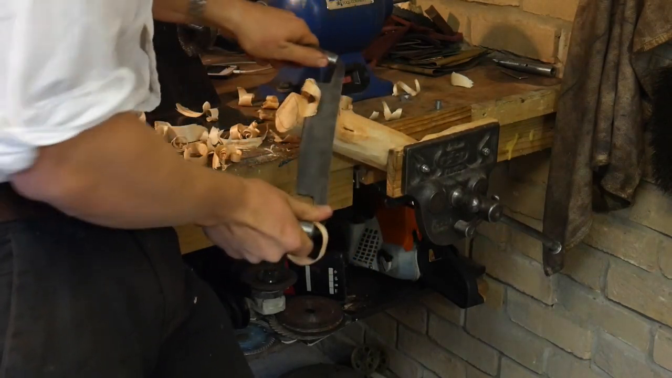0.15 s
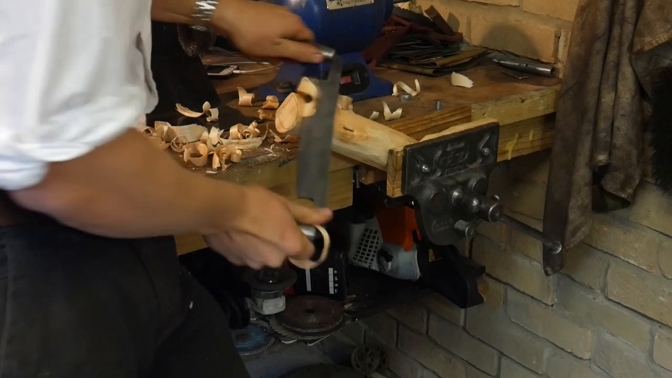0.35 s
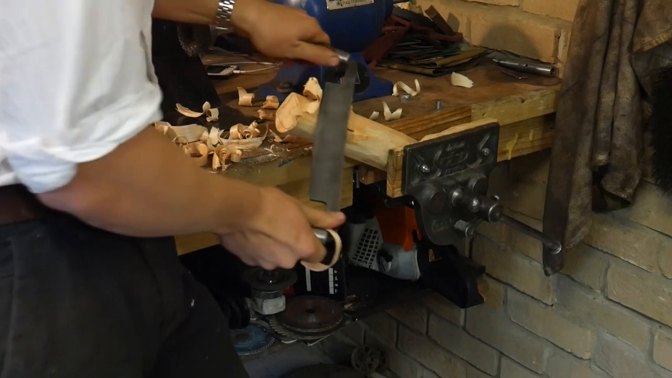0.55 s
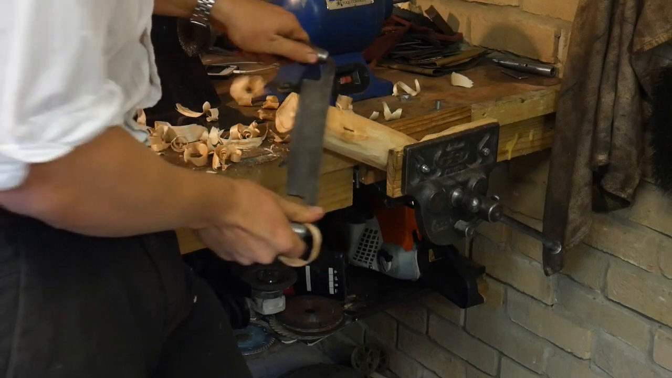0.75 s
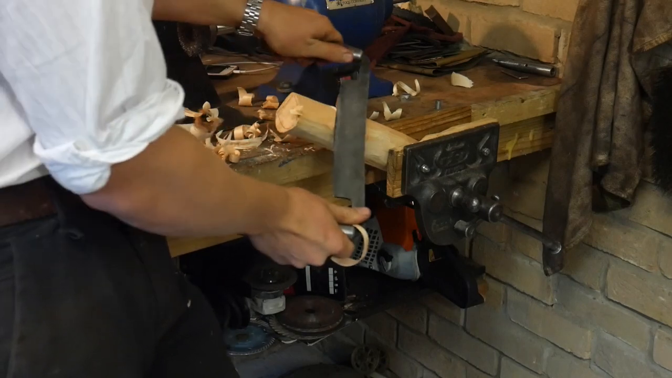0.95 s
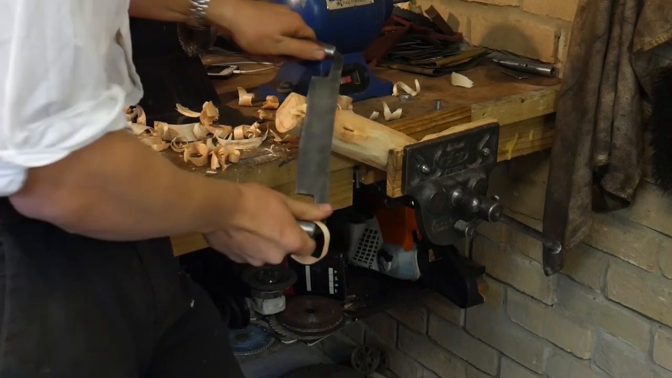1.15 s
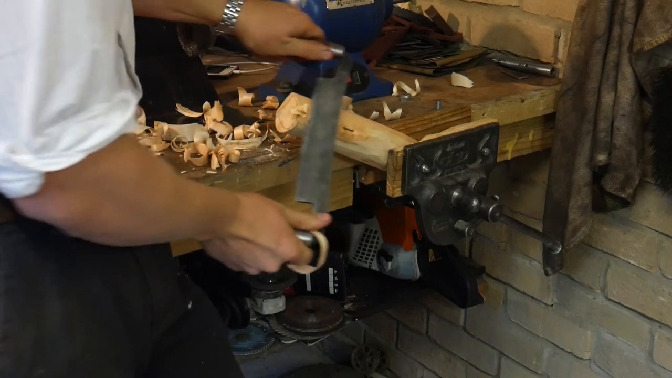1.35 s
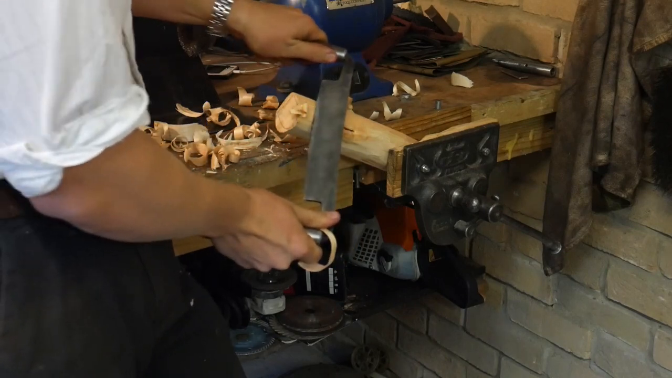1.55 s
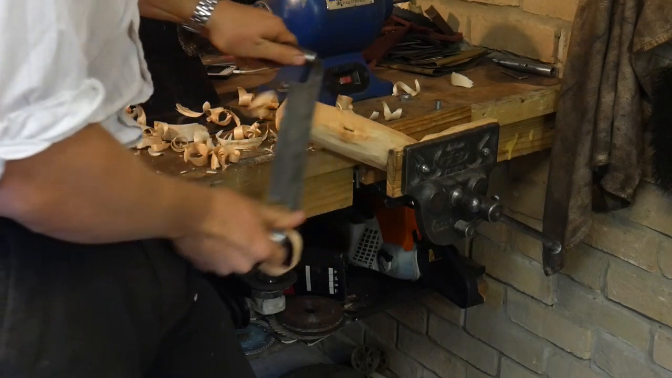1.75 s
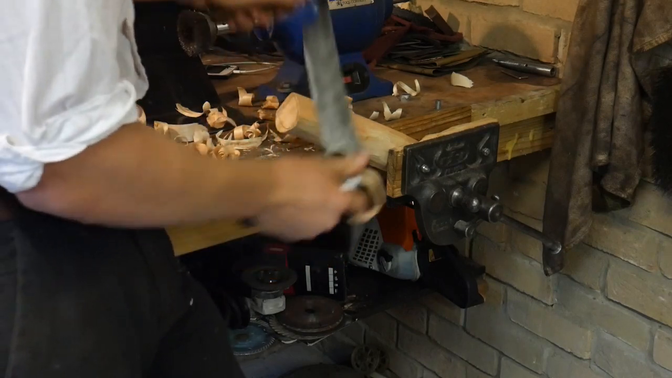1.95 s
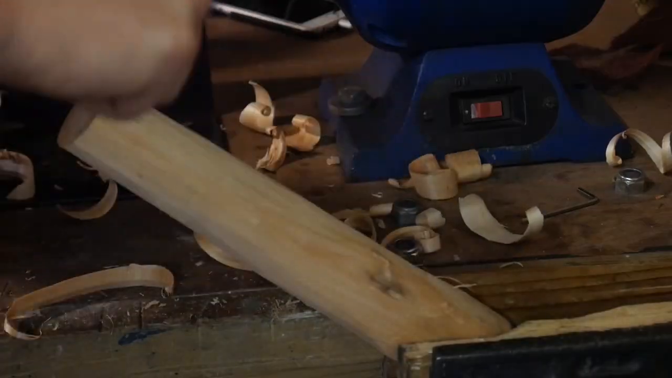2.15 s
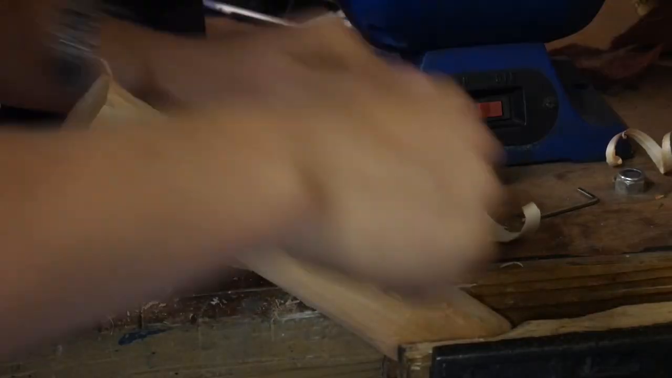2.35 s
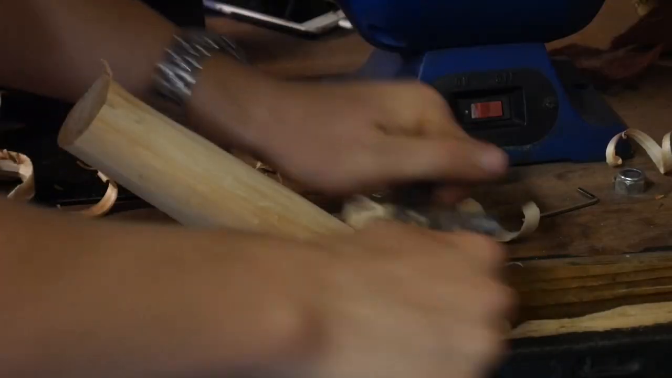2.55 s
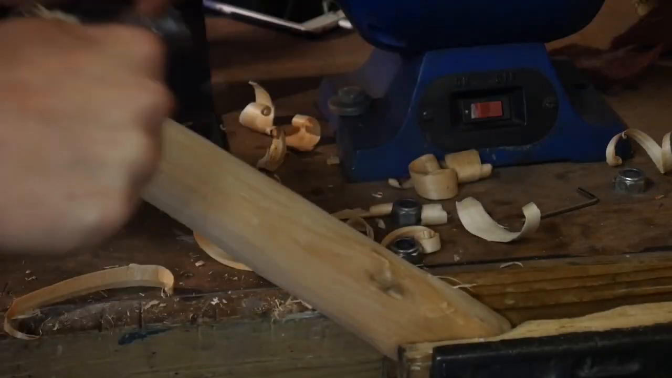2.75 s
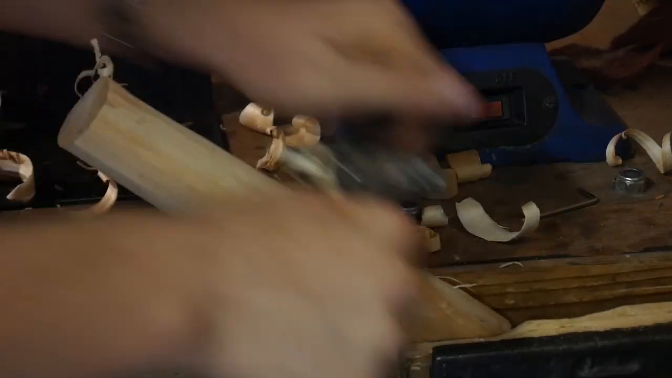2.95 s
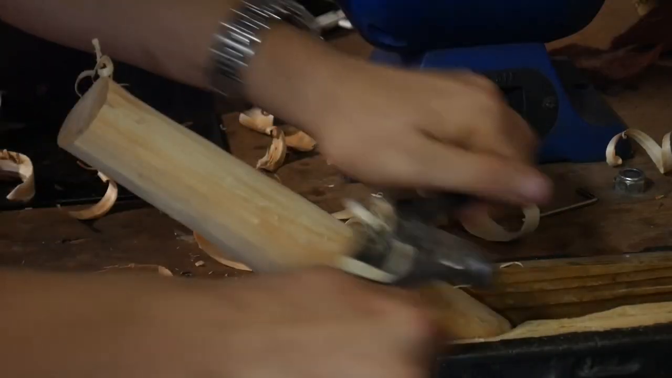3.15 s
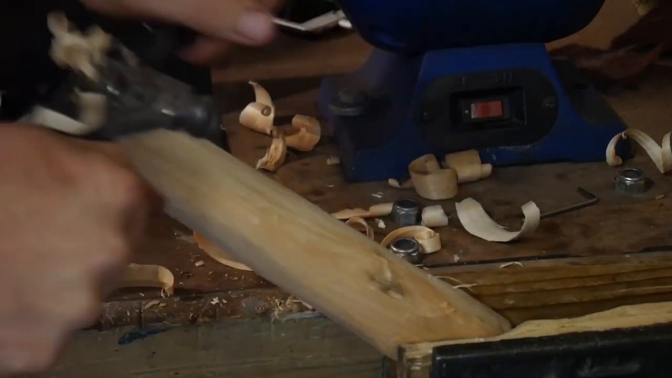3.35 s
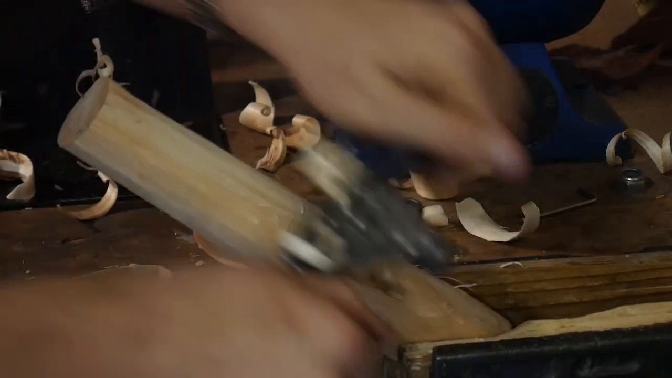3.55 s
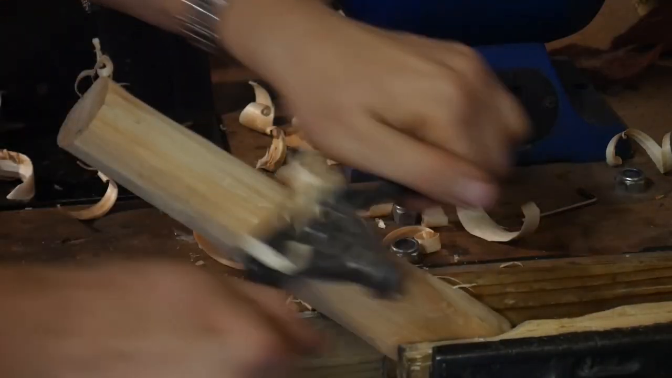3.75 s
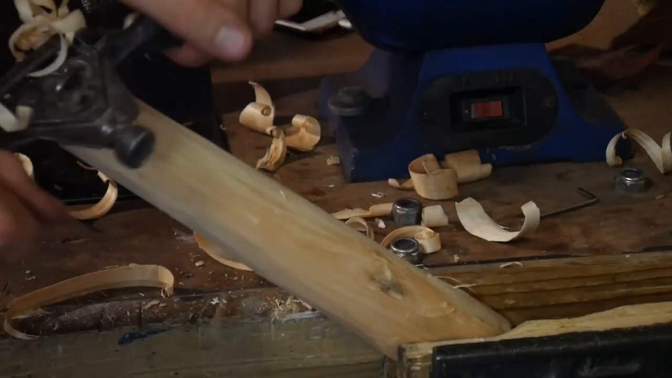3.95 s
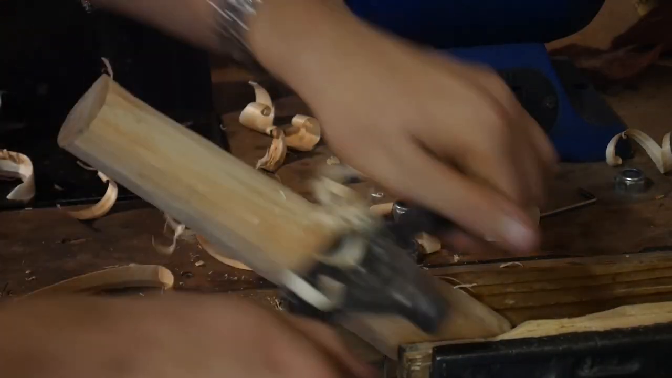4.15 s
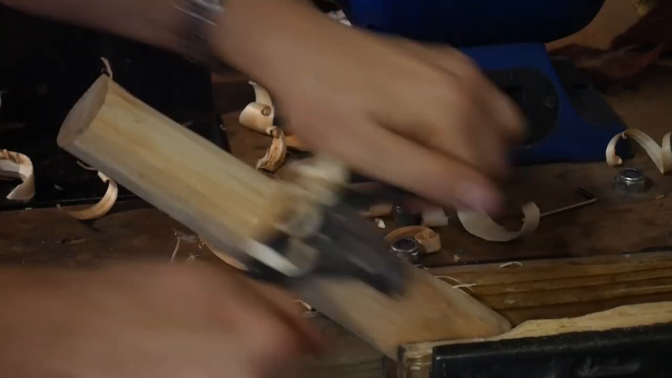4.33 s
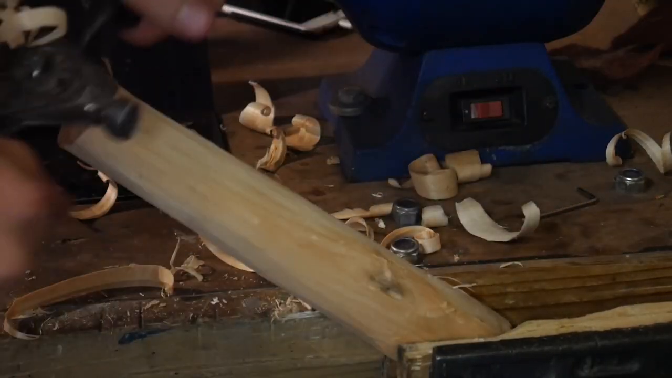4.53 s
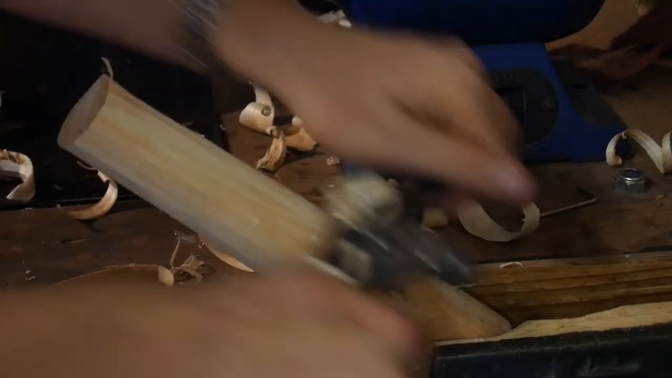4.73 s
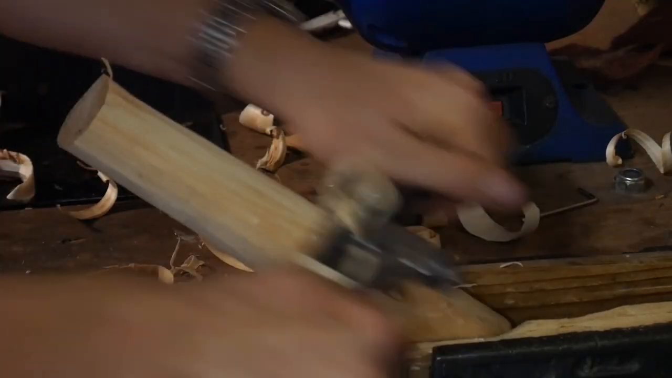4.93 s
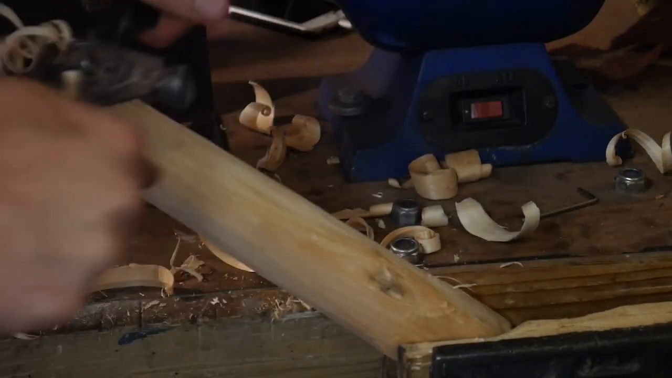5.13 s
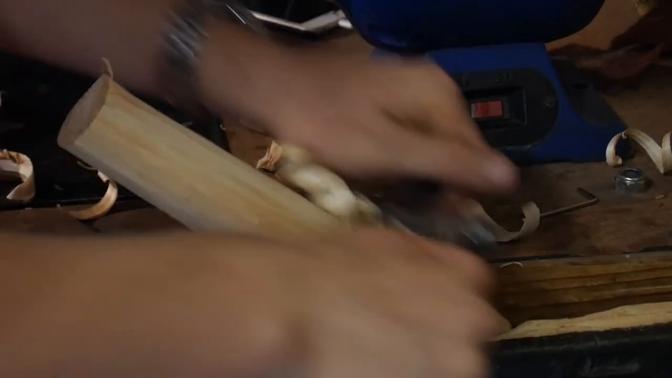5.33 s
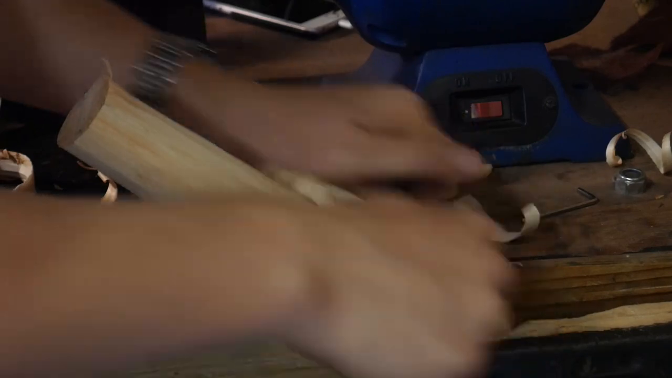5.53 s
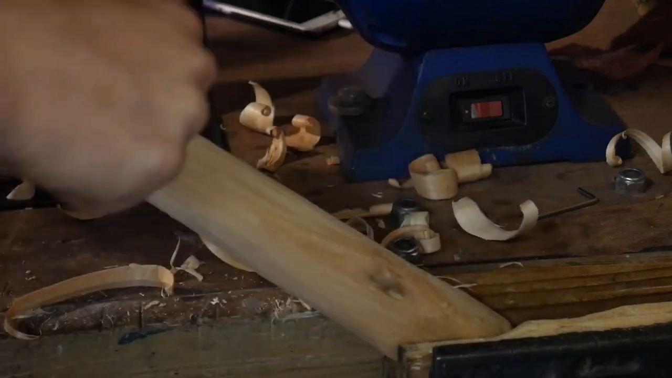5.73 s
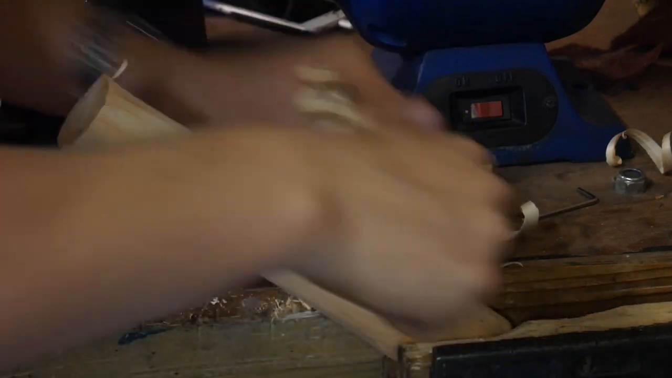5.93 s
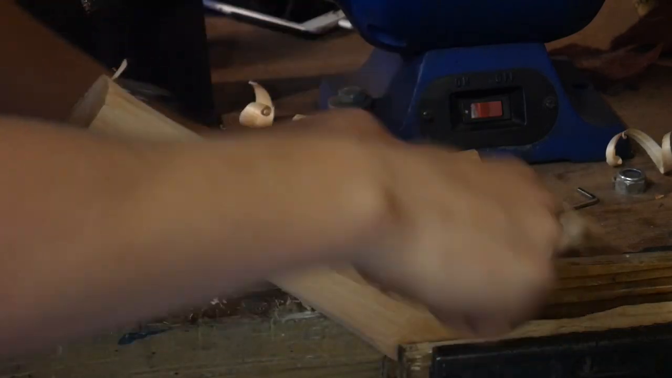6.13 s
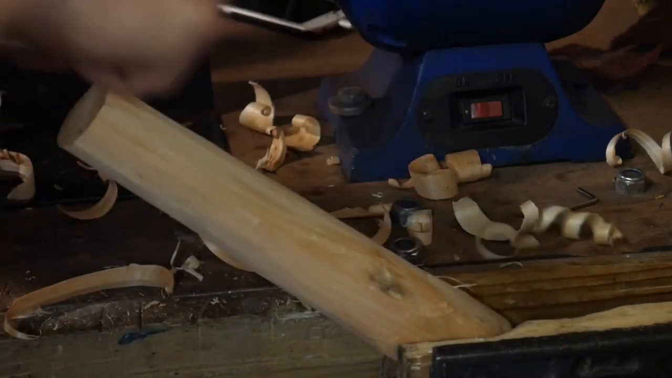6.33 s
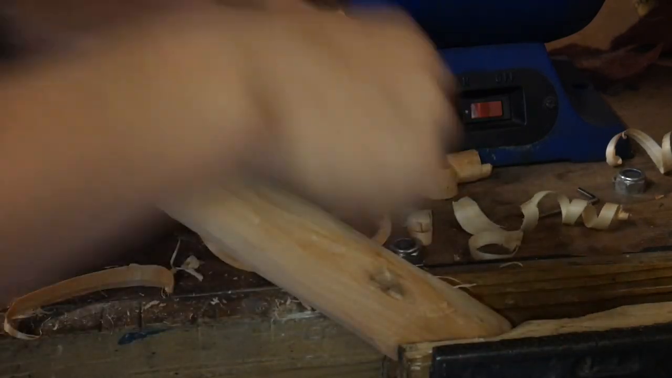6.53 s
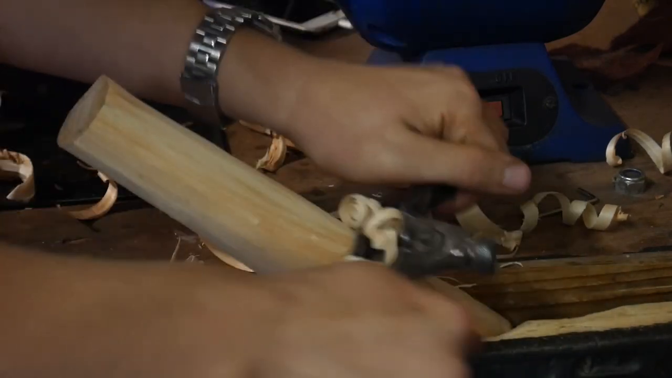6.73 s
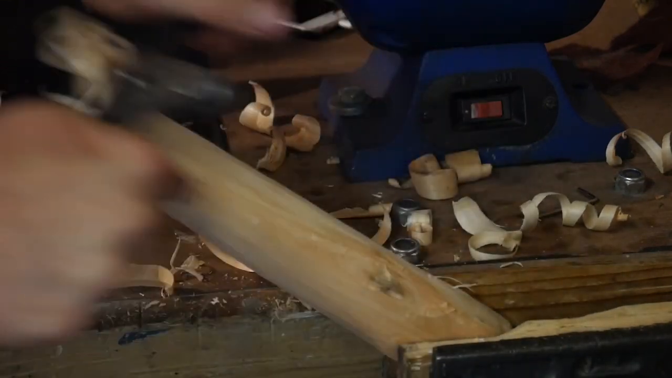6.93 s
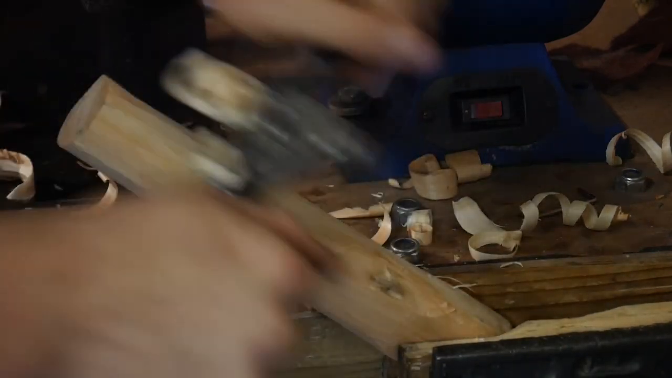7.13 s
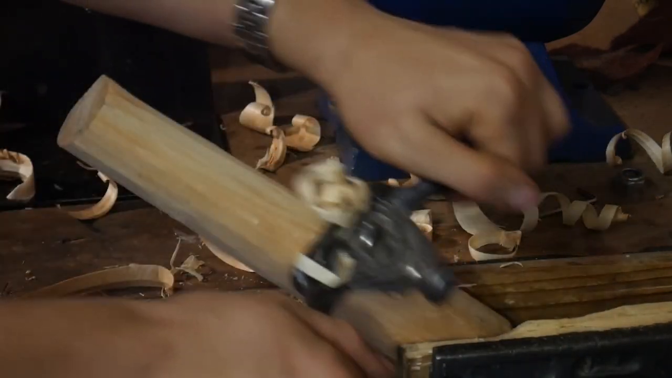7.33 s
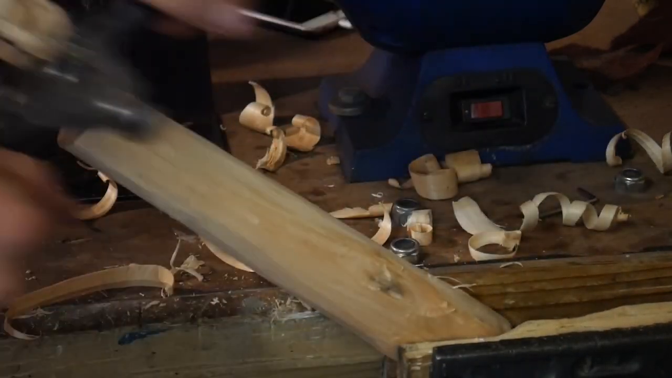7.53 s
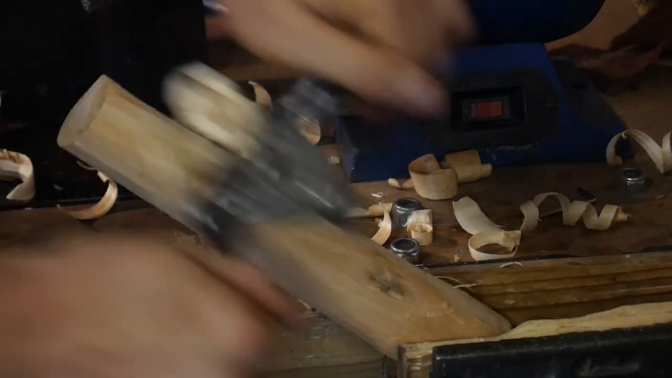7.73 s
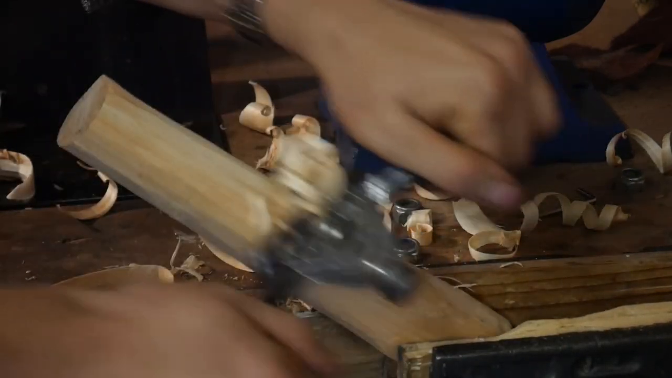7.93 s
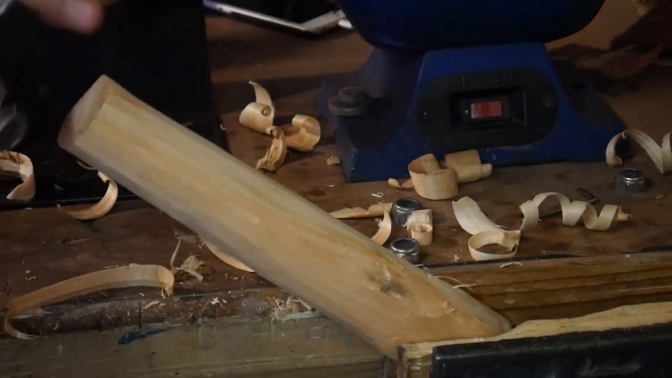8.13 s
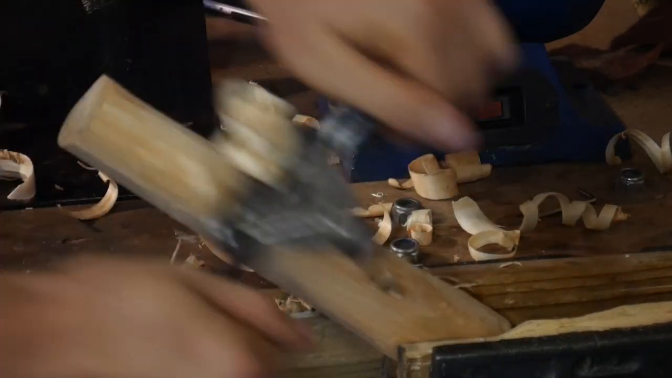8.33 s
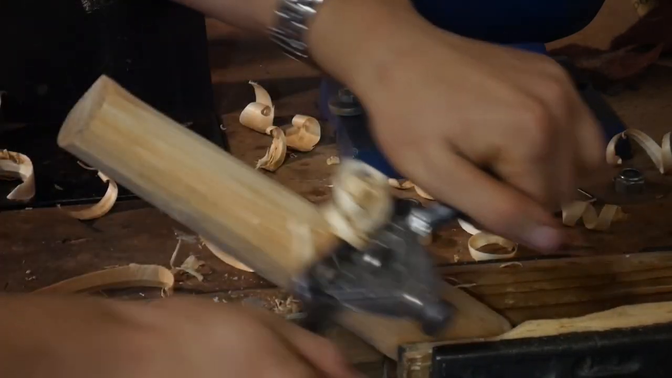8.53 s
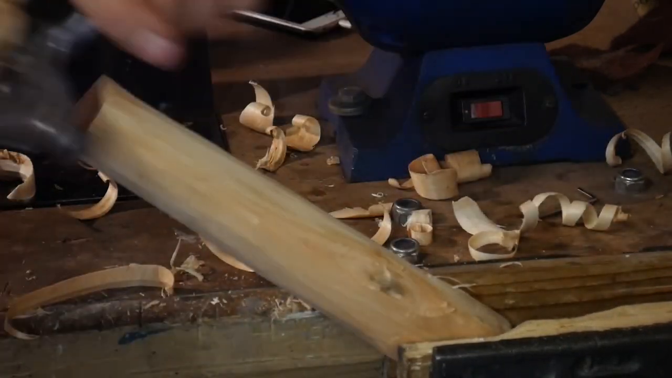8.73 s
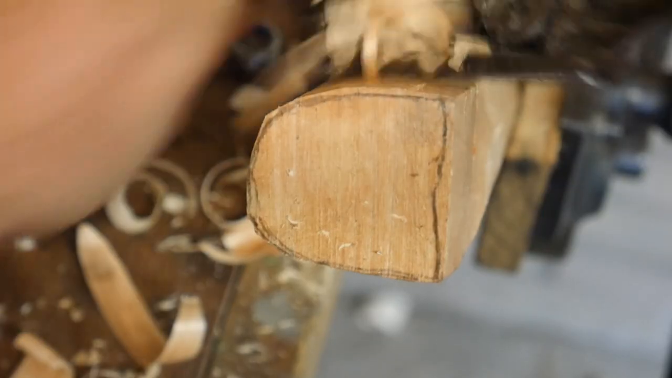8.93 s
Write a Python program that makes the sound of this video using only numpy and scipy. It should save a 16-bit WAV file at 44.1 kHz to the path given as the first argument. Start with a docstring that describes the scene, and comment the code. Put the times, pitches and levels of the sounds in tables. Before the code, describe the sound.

In a small brick workshop, a drawknife makes quiet, irregular short rasps on a clamped billet, with little ticks of snapping fibres. After two seconds a spokeshave takes over, much louder: each quick stroke knocks onto the wood, cuts with a swelling crisp tear and thumps the bench. Faint steel jingles fall between strokes. Close stereo pickup, dry with little echo, over a soft low hush.

```python
"""Wood is shaved in rasping strokes: a drawknife first, then, louder, a spokeshave that mostly knocks, then cuts.
The billet is clamped in a bench vice: rough forces from the edge and short blows set ringing modes going,
so the bench booms, the billet rings and the blade chatters, while filtered noise makes the tearing fibres.
A loose steel part of the tool jingles as it is lifted back; sparse reflections and a soft hush make a small
brick workshop."""
import sys
import numpy as np
from scipy import signal
from scipy.fft import rfft, irfft
from scipy.io import wavfile
from scipy.ndimage import uniform_filter1d

SR = 44100
rng = np.random.default_rng(int(sys.argv[2]) if len(sys.argv) > 2 else 0)


def wav_record(signal):
    """Record a signal, one row per channel, as 16-bit PCM in the file named by sys.argv[1]."""
    frames = np.transpose(np.atleast_2d(signal))
    bounded = np.clip(frames, -1, 1)
    # unit amplitude maps onto the largest positive 16-bit level
    quanta = np.round(bounded * 32767).astype(np.int16)
    wavfile.write(sys.argv[1], SR, quanta)


def ratio(d):
    """dB to gain"""
    e = np.asarray(d, float) / 20
    return 10 ** e


N = 399987

# Steel meets wood as the tool lands or catches. Each row: time in seconds, relative blade level in dB,
# relative crack level in dB, crack pitch in Hz.
KNOCKS = [(0.1593, -38, -27.5, 4870), (0.3504, -65, -40.5, 6500), (0.4314, -45, -29, 6600),
          (0.6972, -46, -43, 3230), (1.1449, -30, -36.5, 4210), (1.2399, -54, -49, 3100),
          (2.0358, -24, -40, 5400), (2.5139, -24.5, -17.5, 5490), (3.0911, -17, -18, 5525),
          (3.2127, -39, -28, 5500), (3.3748, -20, -28, 3030), (3.703, -22.5, -17.5, 5510),
          (4.2452, -26.5, -19.5, 5720), (4.3813, -27, -28.5, 6080), (4.814, -55, -50.5, 6770),
          (4.8454, -16.5, -18, 6080), (5.4296, -38, -27.5, 6200), (5.5583, -43, -38, 5840),
          (5.754, -14, -33, 3050), (6.0793, -31, -31.5, 5450), (6.2677, -24, -41, 5800),
          (6.298, -30, -19, 5470), (6.7589, -25, -19, 6700), (7.3615, -14, -26, 7280),
          (7.9398, -24.5, -25.5, 4800), (8.13, -43, -26.5, 5900), (8.4882, -39, -28, 4750),
          (8.8966, -18.5, -26.5, 5930)]
# The work jolts in the vice as the tool lands, catches or runs out. Each row: time in seconds,
# then the relative levels of bench frame, bench top and billet in dB.
JOLTS = [(0.019, -31.5, -60, -57), (.159, -34, -34.5, -40.5), (0.432, -31.5, -40, -36),
         (0.696, -33, -45, -39.5), (0.801, -40, -48, -52), (.91, -50, -35.5, -48), (1.18, -49, -45, -32.5),
         (1.241, -59, -47, -56), (1.459, -27, -39, -51), (1.695, -48, -45, -32), (1.729, -30, -40, -43),
         (1.87, -44.5, -33, -43), (2.035, -53, -36, -53), (2.18, -37, -20.5, -36.5), (2.2, -33.5, -27, -44),
         (2.513, -40, -23, -28), (2.79, -24.5, -21.5, -28.5), (3.092, -26.5, -26, -25.5),
         (3.212, -24.5, -23.5, -31.5), (3.375, -31, -39, -29), (3.53, -39, -60, -62),
         (3.703, -34, -20, -23.5), (3.811, -19.5, -26.5, -31), (3.991, -26, -49, -42),
         (4.245, -26, -23, -25), (4.321, -25.5, -34, -46), (4.38, -36, -23, -28.5),
         (4.518, -31, -30.5, -40), (4.814, -60, -64, -65), (4.845, -32, -21, -18.5),
         (4.989, -41, -21.5, -28), (5.13, -32, -37, -35), (5.431, -34, -29, -44), (5.45, -37, -32, -53),
         (5.549, -31, -49, -55), (5.753, -50, -25.5, -22.5), (6.079, -37, -31.5, -34),
         (6.27, -26, -27.5, -47), (6.36, -24, -23, -31.5), (6.55, -39.5, -52, -55),
         (6.759, -35, -21.5, -30), (7.01, -24, -32.5, -48), (7.3615, -26.5, -22, -16.5),
         (7.94, -23, -20.5, -21.5), (8.13, -23.5, -26, -27.5), (8.488, -29.5, -21.5, -37),
         (8.70, -40, -37, -30.5), (8.897, -35, -19, -33), (8.921, -36, -22, -39), (8.969, -26, -40, -51),
         (9.029, -36, -27, -35)]
SWAP_S = 2.034  # the spokeshave takes over
WITH_SHAVE = np.arange(N) > SWAP_S * SR


def evened(x):
    """Bring a signal to rms 1."""
    return x / np.sqrt(np.mean(x ** 2) + 1e-20)


def read(points, hz):
    """Read a curve as straight lines on a log-frequency axis."""
    f, value = np.transpose(points)
    return np.interp(np.log(hz + 1), np.log(f + 1), value)


def colour(x, points):
    """Minimum-phase filter with the given dB shape, taps scaled to energy 1."""
    shape_db = read(points, abs(np.fft.fftfreq(4096, 1 / SR)))
    log_gain = np.log(ratio(np.maximum(shape_db, -100)))
    taps = np.fft.ifft(np.exp(np.conj(signal.hilbert(log_gain)))).real[:2048]
    return signal.oaconvolve(x, taps / np.linalg.norm(taps))[:N]


def ring(force, modes, wander_db):
    """The force sets the dying modes of a part going; each takes more or less as the contact moves along."""
    out, energy = np.zeros(N), 0
    steps = np.arange(0, N + 2000, 2000)
    wander = rng.standard_normal((len(modes), len(steps)))
    for (hz, db, t60), chance in zip(modes, wander):
        r = ratio(-60 / (t60 * SR))
        turn = 2 * np.pi * hz / SR
        share = ratio(db + wander_db * np.interp(np.arange(N), steps, chance))
        out += signal.lfilter([np.sin(turn)], [1, -2 * r * np.cos(turn), r * r], share * force)
        energy += ratio(2 * db) / (2 - 2 * r * r)
    return out / np.sqrt(energy)


def effort(part):
    """Force on one part along time: every cut bites, swells and falls away; every blow leaves a shudder."""
    # The driven parts in order: bench frame, bench top, billet, blade, fibres and the fibres' treble.
    parts = ["frame", "top", "billet", "blade", "fibres", "fizz"]
    # The edge cuts. Each row: start in seconds, length in seconds, relative blade chatter in dB,
    # relative fibre tearing in dB, swell while the edge sinks in dB.
    cuts = [(0.0, 0.089, -50, -60, -6), (0.115, 0.077, -45, -39, 8), (0.423, 0.046, -42, -38.5, -1.5),
            (0.566, 0.026, -49, -47, 2), (0.69, 0.025, -45, -44, 4), (.90, 0.12, -55.5, -50, 4),
            (1.145, 0.033, -39.5, -41, 11), (1.23, 0.019, -69, -45, 3), (1.395, 0.081, -38.5, -42.5, 19),
            (1.649, 0.089, -40, -42.5, 13.5), (2.034, 0.11, -31, -28, 19.5), (2.615, .16, -33, -30.5, 13.5),
            (3.209, 0.19, -29.5, -32, 9), (3.807, 0.13, -29, -34, 2.5), (4.352, 0.15, -27.5, -28.5, 19.5),
            (4.936, 0.2, -27, -30, 14.5), (5.547, 0.2, -29.5, -30.5, 18.5), (6.152, 0.21, -27.5, -27, 31),
            (6.804, 0.19, -30.5, -28, 22.5), (7.415, 0.14, -29, -29.5, 21), (8, 0.11, -28.5, -29.5, 24),
            (8.598, 0.13, -30, -31, 27.5), (8.92, 0.085, -28, -26, 5.5)]
    # The tool skims the wood without cutting. Each row: start in seconds, length in seconds,
    # relative fibre level in dB.
    skims = [(.27, 0.043, -47.5), (.345, .03, -55), (.49, .04, -56), (1.29, 0.027, -67), (5.462, .04, -49),
             (6.066, 0.019, -44.5), (6.145, .02, -45), (7.944, .05, -46), (8.31, 0.09, -61),
             (1.822, 0.16, -55), (2.913, 0.1, -53.5), (4.166, 0.087, -53), (5.325, 0.055, -47.5),
             (5.895, 0.087, -44)]
    # How each part follows a cut. Each row, one per part: offset in dB, rise in dB/s, share of the swell
    # [ratio], how early it swells [exponent], easing toward the end in dB, fall in dB/s.
    knife_cut = [(-0.5, 330, 1, 1.1, -1, 102), (2.5, 300, 1, 1.2, 1.5, 101), (-1.5, 300, 1, 1.5, 1.5, 90),
                 (-1.9, 500, 1, 3.4, 0, 162), (-3.2, 600, 0.56, 5.5, 1.5, 186),
                 (1.5, 600, 0.77, 2.3, 1, 148)]
    shave_cut = [(-0.5, 290, 0.65, 1.44, .3, 90), (-4, 330, 0.83, 2.2, 1.3, 130),
                 (-5.5, 260, 0.58, 1.5, .3, 103), (2, 760, 0.89, 3.24, 4.5, 199),
                 (1, 800, 1, 2.07, 2.74, 230), (-1, 770, 0.94, 1.87, 3.9, 256)]  # same columns
    # How each part shudders on after a blow. Each row, one per part: offset in dB, fall in dB/s.
    shudder = [(-1.4, 127), (0.6, 199), (-1.24, 256), (-18.5, 246), (-16.5, 262), (-16, 250)]
    skim_blade_db, skim_swell_db = -11, 8  # blade over fibres; swell
    settle_s = 0.009  # from blow to shudder

    t = np.arange(0, N + 64, 64) / SR
    k = parts.index(part)
    skim_cuts = [(s, length, db + skim_blade_db, db, skim_swell_db) for s, length, db in skims]
    s, length, blade_db, fibre_db, swell_db = np.transpose(cuts + skim_cuts)[:, :, None]
    knife_law = np.array(knife_cut[k])[:, None, None]
    shave_law = np.array(shave_cut[k])[:, None, None]
    offset_db, rise, share, early, ease_db, fall = np.where(s < SWAP_S, knife_law, shave_law)
    since, left = t - s, s + length - t
    cut_db = (fibre_db if part in ("fibres", "fizz") else blade_db) + offset_db
    cut_db = cut_db + rise * np.minimum(since, 0)  # climbs ahead of the start
    cut_db = cut_db - share * swell_db * np.clip(left / length, 0, 1) ** early
    cut_db = cut_db - ease_db * np.clip(since / length, 0, 1) ** 3
    cut_db = cut_db + fall * np.minimum(left, 0)

    if part in ("frame", "top", "billet"):
        rows, column = JOLTS, 1 + k
    else:
        rows, column = KNOCKS, 1 if part == "blade" else 2
    s, db = np.transpose(rows)[[0, column], :, None]
    offset_db, fall = shudder[k]
    after = t - s - settle_s
    shake_db = np.where(after > 0, db + offset_db - fall * after, -200)
    power = ratio(2 * cut_db).sum(0) + ratio(2 * shake_db).sum(0) + 1e-12
    return uniform_filter1d(np.interp(np.arange(N) / SR, t, np.sqrt(power)), 200)


def grit(snaps_per_s, spread_db, smooth, judder_db):
    """The edge snaps fibres one by one over a smooth rub, and judders as it bites."""
    size = ratio(spread_db * np.minimum(rng.exponential(1, N), 5))
    size = size * (rng.random(N) < snaps_per_s / SR)
    rub = rng.standard_normal((2, N))
    force = np.sqrt(1 - smooth) * evened(size * rub[0]) + np.sqrt(smooth) * rub[1]
    judder = uniform_filter1d(uniform_filter1d(rng.standard_normal(N), 300), 300)
    return evened(force * ratio(judder_db * evened(judder)))


def blows(times, levels_db, rise_s, last_s, boost_db, pitch_hz=0, tuned=0, ragged=0):
    """Short ragged bursts of force, another for every blow; where it lands favours one pitch, pure or smeared."""
    t, force = np.arange(4000) / SR, np.zeros(N + 4000)
    shape = (1 - np.exp(-t / rise_s)) * np.exp(-t / last_s)
    noise, slip = rng.standard_normal((len(times), 2, 4000)).transpose(1, 0, 2)
    phase = 2 * np.pi * np.outer(pitch_hz, t) + ragged * np.cumsum(slip, 1)
    bursts = noise + tuned * np.sin(phase)
    for s, db, burst in zip(times, levels_db, bursts):
        force[round(s * SR):][:4000] += ratio(db + boost_db) * shape * burst
    return force[:N]


def jolt_force(levels_db):
    """A jolt pushes the clamped work in a soft burst with a low pitch in it."""
    s = np.transpose(JOLTS)[0]
    return blows(s, levels_db, 0.006, 0.0097, 4.8, 279.5 + 0 * s, tuned=0.24)


def bench_boom():
    """Cuts and jolts set the low modes of the bench frame and the bench top going."""
    # Modes of the frame. Each row: pitch in Hz, relative level in dB, t60 in seconds.
    frame_modes = [(54, -4, 0.35), (75.3, -11, 0.44), (93.3, -23, 0.45), (99.3, -6.5, 0.45),
                   (115.54, 2.5, 0.63), (140.9, 1.5, 0.28), (160, 1.5, 0.36)]
    top_modes = [(193.2, -35, 0.41), (217.7, -1.5, 0.41), (246.5, -2, 0.1), (263.8, 6.5, 0.21),
                 (286, 3, 0.15), (317, -2, 0.18), (340.7, -3.5, 0.25)]  # same columns
    thud = jolt_force(np.transpose(JOLTS)[2])
    sway = effort("frame") * grit(300, 2.15, 0.57, 0.74) + 0.08 * thud
    push = effort("top") * grit(300, 2.64, 0.59, 1.07) + 0.48 * thud
    return ring(sway, frame_modes, 0.7) + ring(push, top_modes, 1.9)


def billet_ring():
    """The dragged and jolted billet rings; its end grain answers a jolt without ringing."""
    # Modes of the billet under the spokeshave. Each row: pitch in Hz, relative level in dB, t60 in seconds.
    short_modes = [(392, 4.5, 0.14), (443.7, 1, 0.18), (511, 8.5, 0.084), (561.4, 7.5, 0.049),
                   (621, 7, 0.058), (680, 3.5, 0.038), (756, 5.5, 0.05), (796, -2.5, 0.1), (904, -8, 0.07),
                   (940, -48, 0.16)]
    # The billet clamped further out, under the drawknife; same columns.
    long_modes = [(348, -15, 0.11), (432, -17, 0.073), (475, 1, 0.1), (552, -3, 0.18), (609, 11, 0.067),
                  (644, 0, 0.04), (737, 1.5, 0.074), (845, -7, 0.18), (984, -8.5, 0.18)]
    tap = jolt_force(np.transpose(JOLTS)[3])
    drag = effort("billet") * grit(600, 0.47, 0.96, 1.43) + 1.3 * tap
    middle = signal.butter(2, [800, 1600], "band", fs=SR, output="sos")
    clack = 0.27 * signal.sosfilt(middle, tap)
    return clack + ring(drag * WITH_SHAVE, short_modes, 2.1) + ring(drag * ~WITH_SHAVE, long_modes, 0.33)


def blade_chatter():
    """The bite of the edge and the knocks set the blade in use ringing."""
    # Modes of the spokeshave blade. Each row: pitch in Hz, relative level in dB, t60 in seconds.
    shave_modes = [(1380, -34, .06), (1410, -3.5, 0.23), (1542, 4.5, 0.036), (1714, 7, 0.041),
                   (1896, 16, 0.026), (1981, 3.5, 0.085), (2042, 8, 0.046), (2140, 3, 0.1),
                   (2343, -0.5, 0.084)]
    knife_modes = [(1370, -7, .04), (1384, 11, 0.046), (1520, 13, 0.045), (1710, 8, 0.04),
                   (2030, 21, 0.017), (2304, 11, 0.057), (2560, 4, .03), (2980, 5, .03), (3520, -2, .05),
                   (3780, -10, .03), (4100, -5, .07)]  # same columns
    s, blade_db, _, _ = np.transpose(KNOCKS)
    bite = effort("blade") * grit(1500, 3.26, 0.61, 1.0) + blows(s, blade_db, 0.00081, 0.0036, 0.39)
    return ring(bite * WITH_SHAVE, shave_modes, 0.28) + ring(bite * ~WITH_SHAVE, knife_modes, 1.3)


def knock_forces():
    """A knock is a pitched crack, a longer rattle as the frame shakes on, and a bright tick of steel on wood."""
    s, _, crack_db, crack_hz = np.transpose(KNOCKS)
    crack = blows(s, crack_db, 0.001, 0.0046, -1.4, crack_hz, tuned=0.62, ragged=0.36)
    rattle = blows(s, crack_db, 0.0031, 0.035, -16.0, crack_hz, tuned=1.09, ragged=0.26)
    tick = np.diff(blows(s, crack_db, 0.00027, 0.0021, -12.0), 2, prepend=[0, 0])
    return crack, rattle, tick


def steel_ring(tear, crack, rattle):
    """The steel of the tool rings, more from a knock than from a cut."""
    # Modes of the spokeshave frame. Each row: pitch in Hz, relative level in dB, t60 in seconds.
    frame_modes = [(3153, 3.5, 0.025), (3650, -8.5, 0.053), (4290, -0.5, 0.063), (4690, 9, 0.014),
                   (5084, 6, 0.037), (5430, 0, 0.013), (5705, 7, 0.013), (6150, 4, 0.016),
                   (6440, -1.5, 0.043), (8760, 5.5, 0.018)]
    knife_modes = [(4120, 6, 0.1), (4870, -31, 0.053), (6200, 8, 0.11), (6980, 10, 0.047)]  # same columns, drawknife
    struck = 0.15 * tear + 0.5 * crack + 0.6 * rattle
    return ring(struck * WITH_SHAVE, frame_modes, 4.9) + 1.4 * ring(struck * ~WITH_SHAVE, knife_modes, 3.1)


def torn_fibres(tear, crack, rattle, fibre_effort):
    """Tearing, knocks and single snaps become coloured noise whose treble follows an effort of its own."""
    # Spectrum of fibres torn by the drawknife. Each row: frequency in Hz, relative density in dB per Hz.
    knife_tear = [(530, -47), (900, 6), (1050, -7), (1100, -13), (1750, -3.5), (2100, -12.5), (2720, -5),
                  (9740, -12), (15500, -28)]
    shave_tear = [(1530, -19.5), (2600, -5), (3280, -0.5), (3560, -0.5), (4760, -3.5), (5700, 2.5),
                  (7620, -3), (10400, -5.5), (15500, -22)]  # same columns, spokeshave
    # Single fibres break. Each row: time in seconds, relative level in dB, pitch in Hz.
    snaps = [(0.085, -29, 7640), (0.2003, -23, 5040), (0.2903, -27, 4440), (0.349, -38, 6100),
             (0.5744, -30, 4540), (0.8989, -46, 4190), (0.9702, -43, 7060), (1.2397, -21.5, 9780),
             (1.6417, -45, 5130), (1.8886, -32, 7800), (4.1874, -56, 7000), (5.3336, -28, 7100),
             (8.771, -13, 6050)]
    s, db, hz = np.transpose(snaps)
    snap = blows(s, db, 0.00038, 0.002, -11.5, hz, tuned=0.77, ragged=0.24)
    torn = tear + 0.98 * crack + 0.47 * rattle + snap
    fibres = 0.88 * colour(torn * WITH_SHAVE, shave_tear) + colour(torn * ~WITH_SHAVE, knife_tear)
    dull = signal.sosfilt(signal.butter(2, 7000, fs=SR, output="sos"), fibres)
    return dull + effort("fizz") / fibre_effort * (fibres - dull)


def shaving():
    """Strokes and knocks drive bench, billet, blade, steel and fibres; the tool changes once."""
    fibre_effort = effort("fibres")
    tear = fibre_effort * grit(3000, 0.76, 0.87, 1.3)
    crack, rattle, tick = knock_forces()
    work = bench_boom() + billet_ring() + blade_chatter() + tick
    work = work + steel_ring(tear, crack, rattle) + torn_fibres(tear, crack, rattle, fibre_effort)
    # the work is too small to sound deeper
    return signal.sosfilt(signal.butter(5, 76, "high", fs=SR, output="sos"), work)


def jingle():
    """A loose part chatters against the steel: ragged bursts ring its high modes."""
    # Jingles. Each row: time in seconds, relative level in dB.
    jingles = [(0.044, -41), (0.111, -42), (0.201, -33), (0.4994, -43), (0.5631, -47), (1.5277, -41.5),
               (1.549, -54), (1.816, -38.5), (1.8916, -52), (4.029, -44), (4.061, -48), (4.599, -39),
               (4.6294, -53), (5.1766, -50), (6.485, -48), (7.65, -41), (8.1734, -37), (8.1994, -55),
               (8.8256, -39)]
    # Modes of the loose part. Each row: pitch in Hz, relative level in dB, t60 in seconds.
    part_modes = [(5900, -22, .05), (7100, -0.5, 0.019), (7350, 2, 0.041), (7600, -11, 0.046)]
    s, db = np.transpose(jingles)
    return ring(blows(s, db, 0.00064, 0.026, -5), part_modes, 1.9)


def echoes(first_s, decay):
    """Two trains of sparse reflections, energy 1, each band dying at its own speed."""
    # Decay off the walls. Each row: frequency in Hz, t60 in seconds before the decay factor.
    walls = [(100, 0.28), (300, 0.27), (1000, 0.25), (3000, 0.37), (10000, 0.21)]
    taps = np.zeros((2, SR // 2))
    at = np.arange(round(first_s * SR), SR // 2 - 20, 20)
    at = at + rng.integers(0, 20, (2, len(at)))
    np.put_along_axis(taps, at, rng.choice([-1., 1.], at.shape), 1)
    hz, t, z = signal.stft(taps, SR, nperseg=256)
    t60 = decay * read(walls, hz)[:, None]
    tail = signal.istft(z * ratio(-60 * t / t60), SR, nperseg=256)[1]
    return tail / np.linalg.norm(tail, axis=1, keepdims=True)


def shop_hush():
    """The quiet of the workshop: steady noise, heaviest in the bass."""
    # Spectrum of the hush. Each row: frequency in Hz, relative density in dB per Hz.
    shop = [(12, -83), (20, -51), (129, 6.5), (306, -5), (565, -7.5), (1160, -17.5), (1980, -19),
            (2920, -23.5), (7310, -27), (15500, -40.5)]
    return ratio(-49.5) * colour(rng.standard_normal(N), shop)


def scene():
    """Sum and difference of the two sides; other parts of the work face each side, and the walls reflect it."""
    # Stereo width. Each row: frequency in Hz, gain on the left-right difference in dB.
    width = [(60, -23), (150, -16.5), (380, -12), (950, -6.5), (2380, -8), (5980, -10), (15000, -0.5)]
    # Stereo balance. Each row: frequency in Hz, left over right in dB.
    balance = [(60, -1), (180, -1), (550, 0.5), (1650, 0), (4970, -2), (15000, 2)]
    work, aside = shaving() + jingle(), shaving() + jingle()
    near, far = echoes(0.0005, 0.21), echoes(0.0066, 0.77)
    both = work + ratio(-19.5) * signal.oaconvolve(work, far[0])[:N] + shop_hush()
    apart = signal.oaconvolve(work, 0.5 * near[1] + 0.2 * far[1])[:N]
    apart = apart + 0.57 * aside + ratio(4.5) * shop_hush()
    size = N + 13  # a quick transform length
    hz = np.fft.rfftfreq(size, 1 / SR)
    both = rfft(both, size)
    apart = rfft(apart, size) * ratio(read(width, hz))
    lean = ratio(read(balance, hz) / 2)
    return np.array([irfft((both + apart) * lean), irfft((both - apart) / lean)])[:, :N]


def band_limit(x):
    """A steep low-pass at the top of the band."""
    return signal.sosfilt(signal.butter(12, 16510, fs=SR, output="sos"), x)


def record(dry):
    """The top falls away steeply above 15.3 kHz, with a narrow dip near 8 kHz."""
    soft_top = signal.sosfilt(signal.butter(8, 15300, fs=SR, output="sos"), dry)
    mix = signal.lfilter(*signal.iirnotch(7900, 60, SR), soft_top)
    return band_limit(mix)


dry = scene()
out = record(dry)
wav_record(out)
```